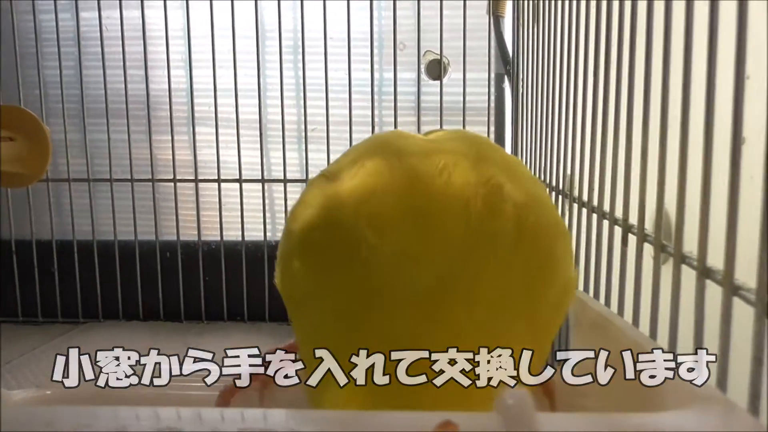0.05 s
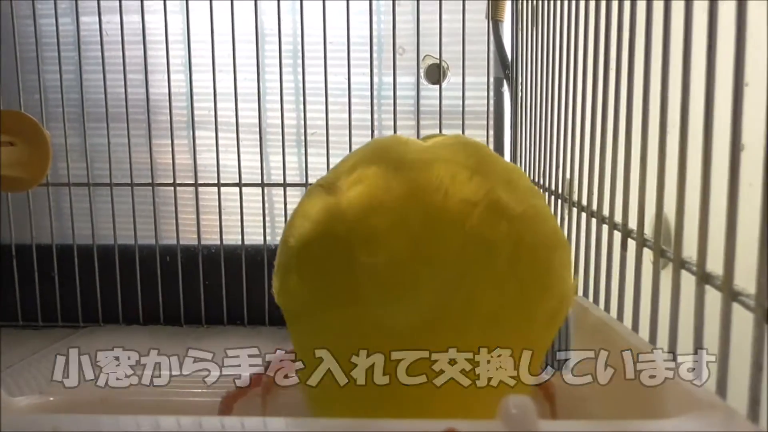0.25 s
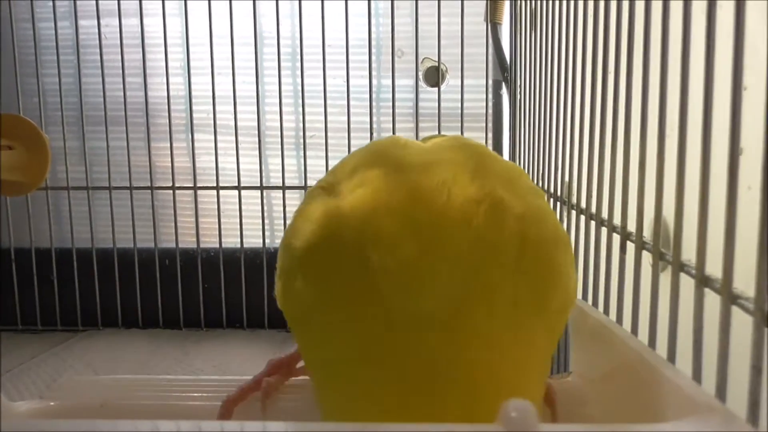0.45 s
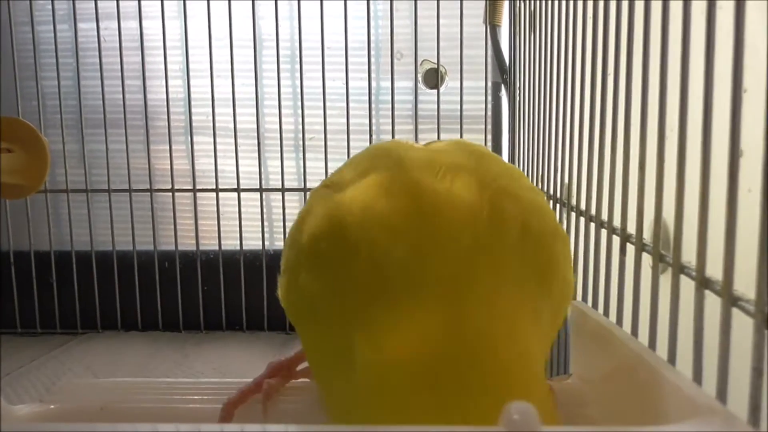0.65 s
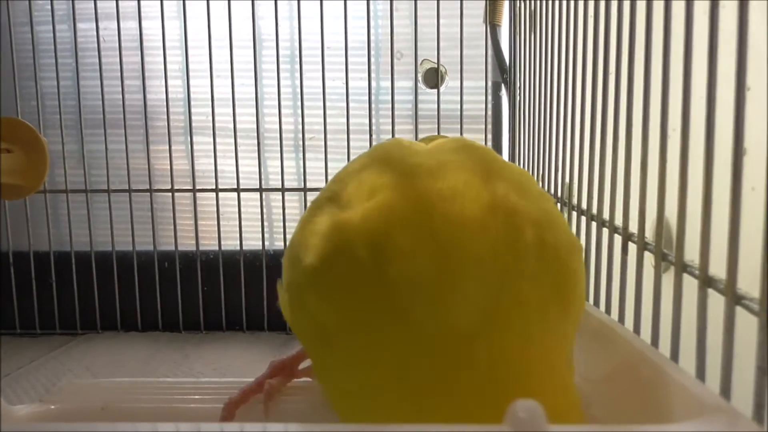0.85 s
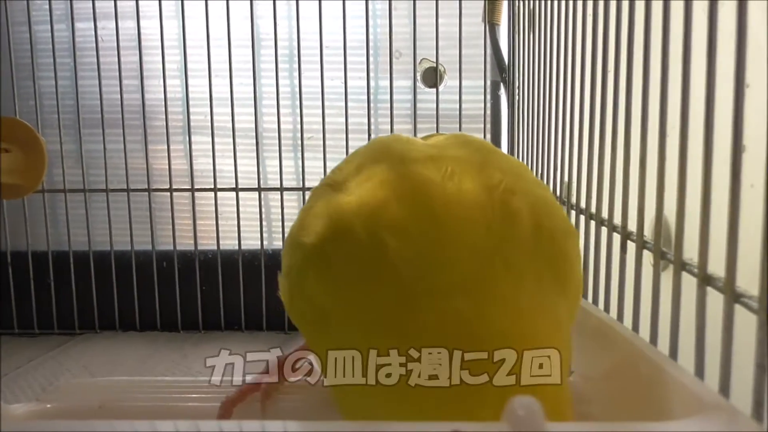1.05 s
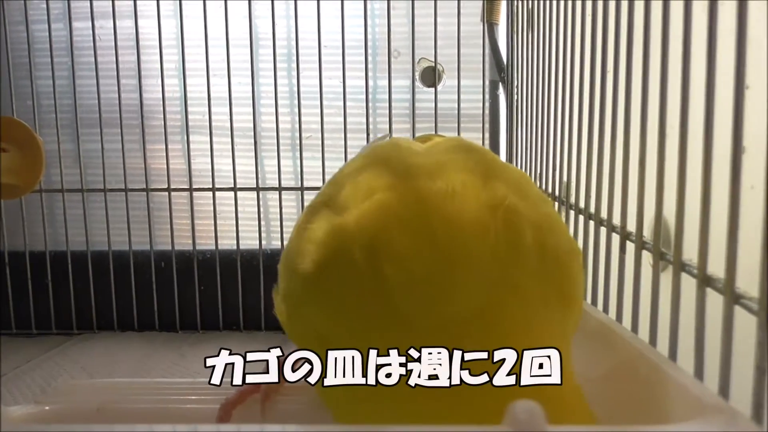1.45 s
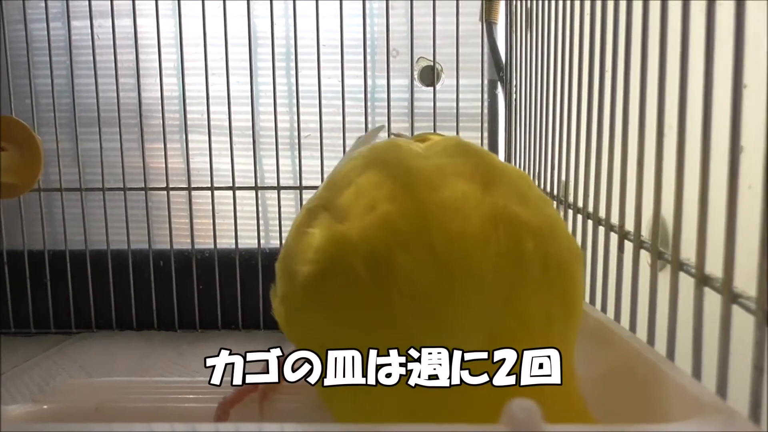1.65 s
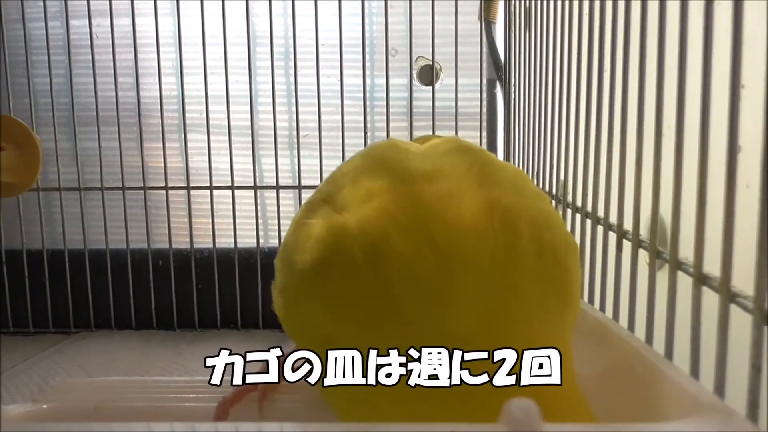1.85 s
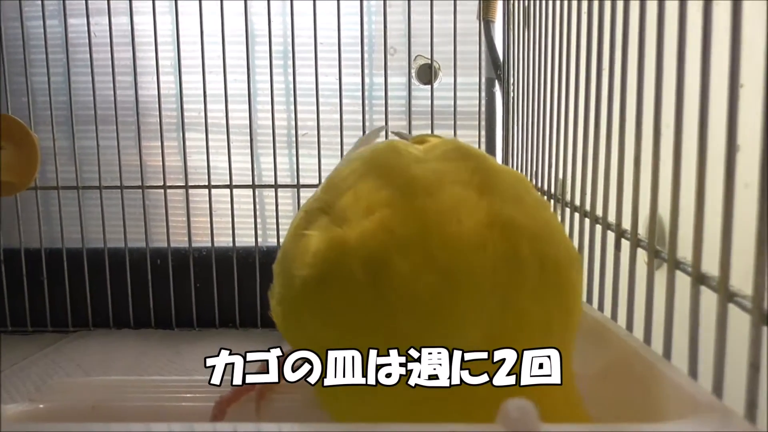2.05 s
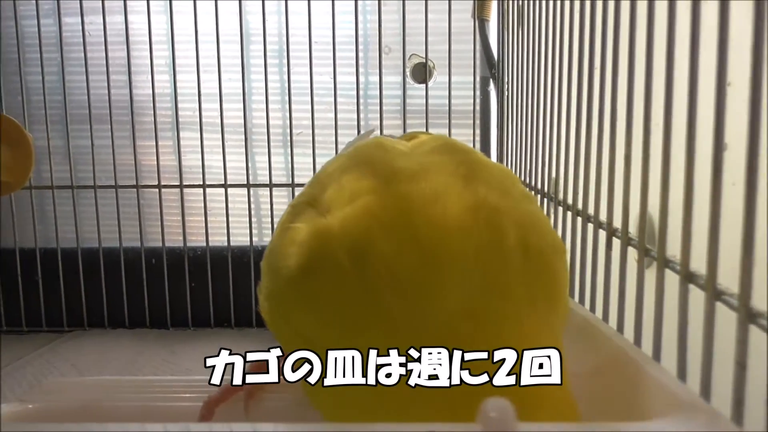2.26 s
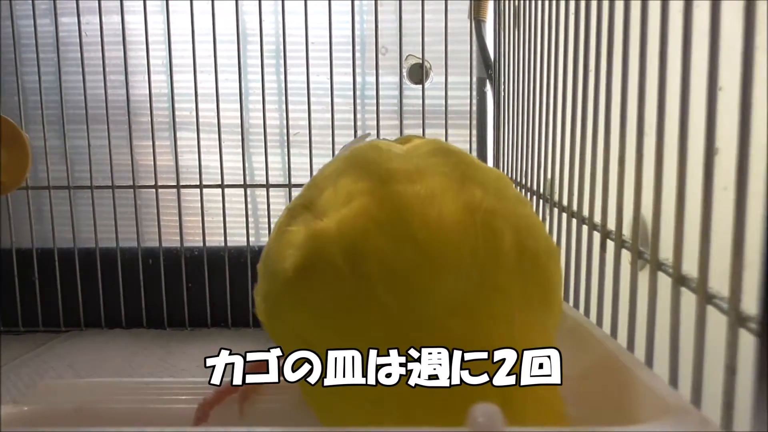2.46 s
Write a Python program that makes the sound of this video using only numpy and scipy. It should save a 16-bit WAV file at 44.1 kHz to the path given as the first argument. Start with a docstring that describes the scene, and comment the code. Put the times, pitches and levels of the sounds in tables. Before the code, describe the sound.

Light taps and gritty scrapes of a budgie's beak and claws on its cage floor.

```python
"""A budgerigar shuffles and pecks in the plastic tray of a wire cage, close by, over soft room noise.
First its beak and claws tap the tray, which clacks and thuds. Between taps they scrape over it in short
gritty strokes that ring the wires, and now and then they stick and squeak. After a second the bird
grows quieter; a busy flurry follows from 1.6 s, and a few light taps end the scene.
All along, the cage and the room add short echoes."""
import sys
import numpy as np
from scipy import signal
from scipy.fft import rfft, irfft
from scipy.io import wavfile
from scipy.ndimage import uniform_filter1d

SR = 44100
rng = np.random.default_rng(int(sys.argv[2]) if len(sys.argv) > 2 else 0)


def bounce(signal):
    """Save signal as a 16-bit WAV file at the path given by the first command-line argument."""
    frames = np.transpose(np.atleast_2d(signal))
    limited = np.clip(frames, -1, 1)
    pcm = np.round(limited * 32767).astype(np.int16)
    wavfile.write(sys.argv[1], SR, pcm)


N = 110250
t = np.arange(N) / SR

# The tones of the plastic tray: pitch_hz, level_db, ring_s (time to fade by 60 dB)
TRAY_TONES = [(190.5, -12.5, 0.079), (246, -12, 0.043), (272, -5.5, 0.045), (324, -4, 0.035),
              (399, 0, 0.038), (476, -9, 0.031), (560, -13, 0.044), (628, -9, 0.024), (650, -7.5, 0.033),
              (860, -30, 0.017), (975, 4, 0.0077), (1206, -11, 0.024), (1337, 5, 0.008), (1609, -9, 0.013),
              (1892, -2, 0.0068)]
THUD_BELOW_HZ = 900  # lower tray tones make the thud, the others the clack


def amp(db):
    """Turn decibels into a gain."""
    return 10 ** (np.asarray(db) / 20)


def unit(x):
    """Scale a sound to an average (rms) level of 1."""
    return x / np.sqrt(np.mean(x ** 2))


def neutral(x):
    """Scale to a total energy of 1, so that noise played through it keeps its power."""
    return x / np.sqrt(np.sum(x ** 2))


def through(x, response):
    """Play a sound through a response: the way an object answers a single click."""
    return signal.fftconvolve(x, response)[:N]


def filtered(x, order, hz, kind):
    """Keep the lows, the highs or a band; a higher order cuts more steeply."""
    return signal.sosfilt(signal.butter(order, hz, kind, fs=SR, output="sos"), x)


def colour(points, size=2048):
    """Build a response whose tone follows (pitch_hz, level_db) points."""
    hz, db = np.array(points, float).T
    freqs = np.maximum(np.fft.rfftfreq(size, 1 / SR), 1)
    gains = amp(np.interp(np.log(freqs), np.log(hz), db))
    cepstrum = irfft(np.log(gains))
    cepstrum[1:size // 2] *= 2  # fold it so that nothing sounds before the click
    cepstrum[size // 2 + 1:] = 0
    return irfft(np.exp(rfft(cepstrum)))


def rise_and_fade(rise_s, ring_s, size):
    """A level that builds quickly and falls by 60 dB in ring_s."""
    age = t[:size]
    return (1 - np.exp(-(age / rise_s) ** 2)) * np.exp(-np.log(1000) * age / ring_s)


def ring(tones, contact_s=0.00037, size=8192):
    """A struck object rings with several fading tones; the peak is 1."""
    sound = sum(amp(db) * np.sin(2 * np.pi * hz * t[:size]) * rise_and_fade(contact_s, ring_s, size)
                for hz, db, ring_s in tones)
    return sound / np.abs(sound).max()


def stereo(mid, side, width):
    """Left and right share the mid sound and differ by the side sound."""
    return np.array([mid + width * side, mid - width * side])


def add(out, start_s, sound, pan_db):
    """Mix a sound in at its time; pan_db is how much louder it is on the left."""
    i = int(start_s * SR)
    sound = sound[..., :N - i]
    out[:, i:i + sound.shape[-1]] += amp([[pan_db / 2], [-pan_db / 2]]) * sound


def room_noise(level_db=-63):
    """Soft, low room noise, mostly alike on both sides."""
    # The tone of the quiet room: pitch_hz, level_db
    room_tone = [(20, -9), (50, -13), (80, 0), (140, -5), (195, 3), (260, -9), (600, -13.5), (900, -13),
                 (1300, -18), (2400, -31.5), (5500, -35), (9000, -29.5), (12000, -27), (16000, -31.5)]
    response = colour(room_tone, size=8192)
    mid, side = (unit(through(rng.standard_normal(N), response)) for _ in range(2))
    return amp(level_db) * stereo(mid, side, width=0.52)


def cage_and_room_echoes(dry, first_echo_s=0.0011, size=26000):
    """Quick echoes inside the cage and the longer tail of the room."""
    # Echoes by band: low_hz, high_hz, cage_db, cage_ring_s, room_db, room_ring_s, width (0 to 1)
    echo_bands = [(77, 780, -9, 0.1, -7, 0.17, 0.96), (556, 1730, -13, 0.054, -11.5, 0.2, 1),
                  (2410, 11900, -4.5, 0.015, -17, 0.44, 0.24)]
    response = 0
    for low_hz, high_hz, cage_db, cage_ring_s, room_db, room_ring_s, width in echo_bands:
        band_gain = np.sqrt(2 * (high_hz - low_hz) / SR)  # a wider band holds more energy
        for db, ring_s in ((cage_db, cage_ring_s), (room_db, room_ring_s)):
            noise = filtered(rng.standard_normal((2, size)), 3, [low_hz, high_hz], "band")
            mid, side = noise * rise_and_fade(first_echo_s, ring_s, size)
            tails = np.array([neutral(tail) for tail in stereo(mid, side, width)])
            response = response + amp(db) * band_gain * tails
    return np.array([through(channel, tail) for channel, tail in zip(dry, response)])


def wall_echoes(x, delay_s=0.0052, bounce_gain=0.075, top_hz=2600):
    """Sound bounces to and fro between two walls: four quick, dull echoes make the knocks boxy."""
    lag = int(delay_s * SR)
    dull = filtered(x, 1, top_hz, "low")
    return sum(bounce_gain ** k * np.pad(dull, ((0, 0), (k * lag, 0)))[:, :N] for k in range(1, 5))


def slips(per_s, spread_db, size):
    """Tiny slips of a claw: random clicks of uneven strength, pushing either way."""
    happens = rng.random(size) < per_s / SR
    direction = rng.choice([-1, 1], size)
    return happens * direction * amp(spread_db * np.clip(rng.standard_normal(size), -2, 2))


def shudder(knock, level_db, ring_s, rise_s=0.0054):
    """A knock plus the short, uneven shudder it sets off in the tray, different every time."""
    size = len(knock)
    shaking = neutral(rng.standard_normal(size) * rise_and_fade(rise_s, ring_s, size))
    shaken = neutral(through(knock, shaking)[:size])
    return knock + amp(level_db) * np.linalg.norm(knock) * shaken


def tray_clack(top_hz=2080):
    """The tray's higher tones make a hollow clack; it gives off little above top_hz."""
    high_tones = [tone for tone in TRAY_TONES if tone[0] >= THUD_BELOW_HZ]
    return neutral(filtered(ring(high_tones), 10, top_hz, "low"))


def tray_thud(spot_hz, loss_db_per_octave=7, spread_db=3):
    """Each spot of the tray favours the low tones near its own pitch; the mix varies with each blow."""
    tones = []
    for hz, db, ring_s in TRAY_TONES:
        if hz < THUD_BELOW_HZ:
            loss_db = loss_db_per_octave * abs(np.log2(hz / spot_hz))
            tones.append((hz, db - loss_db + spread_db * rng.standard_normal(), ring_s))
    return shudder(ring(tones), level_db=-6.5, ring_s=0.11)


def grit_and_wires(forces, tilt_db_per_octave, wire_db=-10.5, wire_spread_db=6, detune=0.0068):
    """A hard little contact: each has its own gritty tone and shakes a different mix of wires."""
    # The ringing of the cage wires: pitch_hz, level_db, ring_s
    wire_tones = [(2716, 0, 0.064), (3670, 1, 0.078), (7940, 11, 0.014), (8900, -10, 0.015),
                  (10330, 11.5, 0.025), (11270, 16, 0.019)]
    # The tone of a tiny contact: pitch_hz, level_db
    grit_tone = [(500, -1), (1800, -11), (2350, -5.5), (2750, -3), (3700, -1), (5600, -6), (7800, 2.5),
                 (10500, 1.5), (12500, -0.5), (15000, -8), (16500, -19)]
    wires = []
    for hz, db, ring_s in wire_tones:
        louder, higher = rng.standard_normal(2)  # neighbouring wires differ a little in pitch
        wires.append((hz * (1 + detune * higher), db + wire_spread_db * louder, ring_s))
    grit = [(hz, db + rng.standard_normal()) for hz, db in grit_tone]
    response = neutral(colour(grit, size=8192)) + amp(wire_db) * neutral(ring(wires))
    # tip the treble up or down around 8000 Hz
    tilt = colour([(8000 * 2 ** octaves, tilt_db_per_octave * octaves) for octaves in (-1.5, 1)])
    response = neutral(through(response, tilt)[:len(response)])
    mid, side = (through(force, response) for force in forces)
    return stereo(mid, side, width=0.56)


def fidgeting_feet(clack_db=-74.5, grit_db=-84.5):
    """The restless feet keep making ticks that can barely be heard."""
    clicks = slips(per_s=110, spread_db=3, size=N)
    clacks = through(clicks, tray_clack())
    grit = grit_and_wires([clicks, clicks * rng.standard_normal(N)], tilt_db_per_octave=-12)
    return amp(clack_db) * unit(clacks) + amp(grit_db) * unit(grit)


def squeaks_and_wire_rings(pitch_waver=0.063, flutter_db=3.5, size=2000):
    """Short wavering tones: a claw sticks and slips, or a cage wire rings briefly."""
    # Claw squeaks and creaks, plus two brief high rings of the cage wires (2730 and 2750 Hz):
    # start_s, length_s, pitch_hz, level_db, pan_db
    short_tones = [(0.278, 0.046, 1120, -50.5, -5), (.550, 0.0182, 1250, -44, -7),
                   (0.605, 0.016, 1294, -52.5, -10), (0.764, 0.036, 1239, -49, -9),
                   (0.775, 0.0084, 2730, -51, -9), (0.913, 0.05, 395, -54.5, 4),
                   (0.927, 0.016, 1287, -48, 1), (1.698, 0.012, 2750, -48.5, -4),
                   (2.028, 0.012, 2000, -47.5, -3), (2.066, 0.0093, 1418, -44, -17),
                   (2.067, 0.025, 1032, -44, -6)]
    out = np.zeros((2, N))
    for start_s, length_s, pitch_hz, level_db, pan_db in short_tones:
        waver, flutter = (unit(uniform_filter1d(rng.standard_normal(size), size=40)) for _ in range(2))
        phase = 2 * np.pi * np.cumsum(pitch_hz * (1 + pitch_waver * waver)) / SR
        tone = np.sqrt(2) * np.sin(phase) * unit(amp(flutter_db * flutter))
        swell = np.sqrt(np.abs(np.sin(np.pi * np.minimum(t[:size] / length_s, 1))))
        add(out, start_s, amp(level_db) * swell * tone, pan_db)
    return out


def shower(pressure, per_s, spread_db):
    """A shower of slips that gets louder as the claw presses harder."""
    return neutral(slips(per_s, spread_db, len(pressure)) * pressure) * np.linalg.norm(pressure)


def scrapes(thud_hz=306, size=12000):
    """A claw drags over the tray: its tiny slips swell and fade, shaking the tray and the wires."""
    # Claw strokes: peak_s, rise_s, fall_s, grit_db, tilt_db_per_octave, clack_db, thud_db, pan_db
    strokes = [(0.057, 0.092, 0.0051, -66, 0.5, -62.5, -94, 2.5),
               (0.115, 0.0085, 0.016, -61, 0.5, -61.5, -67, 5.5),
               (.229, 0.0082, 0.015, -54, -4.5, -47.5, -63, 3), (0.277, 0.019, 0.051, -71, 5, -54, -51, -4),
               (0.33, 0.0009, 0.0029, -39, 0.5, -34.5, -67, 2.5),
               (0.371, 0.0019, 0.0075, -42, 1, -46.5, -47, 2.5),
               (0.387, 0.0088, 0.034, -51, -2.5, -43, -49, 1),
               (0.487, 0.0018, 0.015, -44, -1.5, -47.5, -79, 1.5),
               (0.505, 0.0048, 0.012, -51, -2, -49, -44, 4),
               (0.5495, 0.00066, 0.0084, -42.5, 5, -73, -48, 0.5),
               (.582, .002, 0.015, -55.5, 0.5, -57.5, -51.5, 3.5),
               (.62, .012, 0.025, -66.5, -20, -64.5, -60.5, 2),
               (0.779, 0.0078, 0.0056, -53, -5.5, -56, -54, 2),
               (.797, 0.0034, 0.032, -60.5, -1.5, -61, -65, 2.5),
               (.919, 0.0054, 0.014, -45, 0.5, -60.5, -66, 1.5),
               (.932, 0.0046, 0.0088, -40.5, -1, -49, -56, 2), (.955, .008, 0.026, -72, -13, -63.5, -53, 4),
               (1.085, 0.0069, 0.017, -65.5, 0, -92, -70, 3),
               (1.613, 0.0019, 0.0069, -52, 3, -58.5, -58, -3.5),
               (1.632, 0.0027, 0.0044, -53, 3.5, -61.5, -77, 11),
               (1.648, 0.0019, 0.0065, -49.5, 4.5, -57, -60, -6),
               (1.665, 0.0052, 0.015, -48.5, -0.5, -53.5, -47, 6.5),
               (1.702, 0.0048, 0.015, -48.5, 0, -50.5, -77, -3),
               (1.716, 0.005, 0.015, -50, -1.5, -57.5, -53.5, 3),
               (1.737, 0.004, 0.007, -58, -9, -51, -60, -5),
               (1.771, 0.0054, 0.012, -44.5, -0.5, -49, -59, 5),
               (1.837, 0.0081, 0.024, -58, -3.5, -57, -51.5, 3),
               (1.998, 0.0015, 0.016, -45, 5, -51, -80, 4),
               (2.011, 0.0052, 0.025, -48.5, -2.5, -45.5, -47, -1),
               (2.053, 0.0019, 0.0042, -47, 1, -43, -49, 6),
               (2.066, 0.0032, 0.0026, -44.5, 0, -43, -56, -3),
               (2.111, 0.0076, 0.014, -48.5, 1, -55, -46, 0.5),
               (2.159, .004, 0.001, -44.5, 3.5, -46.5, -42, 0),
               (2.211, 0.0076, 0.02, -50, 2.5, -56.5, -46, 2),
               (2.26, 0.0091, 0.16, -67.5, -1, -67, -69.5, 1),
               (2.482, 0.025, 0.032, -64.5, -4, -54, -59, -4)]
    out = np.zeros((2, N))
    for peak_s, rise_s, fall_s, grit_db, tilt, clack_db, thud_db, pan_db in strokes:
        start_s = max(peak_s - 4 * rise_s, 0)
        since_peak = start_s + t[:size] - peak_s
        pressure = np.exp(np.minimum(since_peak / rise_s, -since_peak / fall_s))
        clack_slips, thud_slips = (shower(pressure, per_s=4500, spread_db=6) for _ in range(2))
        sharp_slips = [shower(pressure, per_s=2200, spread_db=6.5) for _ in range(2)]
        clack = amp(clack_db) * through(clack_slips, tray_clack())
        thud = amp(thud_db) * through(thud_slips, neutral(tray_thud(thud_hz)))
        grit = amp(grit_db) * grit_and_wires(sharp_slips, tilt)
        add(out, start_s, clack + thud + grit, pan_db)
    return out


def taps(band_ratio=1.285, tick_fall_s=0.0011, snap_gain=0.33, size=400):
    """Beak or claw hits the tray: a clack pitched by the contact, a thud and a crackly tick."""
    # Hits of beak and claws: start_s, clack_db, clack_hz, thud_db, thud_hz,
    # tick_db (before the tick is doubled), tilt_db_per_octave, pan_db
    hits = [(0.0387, -42, 1460, -62, 400, -45, -5, 3), (0.069, -46, 1260, -52, 300, -43, 2.5, 1.5),
            (.116, -51, 1310, -68, 300, -28.5, 3.5, 1.5), (0.2203, -18, 1490, -43.5, 230, -23.5, 3.5, 3),
            (0.3323, -27, 1680, -42, 285, -46, -2, 2.5), (0.3827, -23.5, 1450, -39, 230, -45, 7, 3.5),
            (0.3941, -32, 1040, -43.5, 420, -42, 11, -11.5), (0.4885, -27, 1740, -55, 300, -32.5, -2, 3),
            (0.5019, -27, 1250, -33, 404, -38, -2, 0.5), (.606, -52, 1310, -65, 250, -40.5, -13, -10),
            (0.6758, -38.5, 1410, -57, 252, -26, 1, 1), (0.735, -50, 1300, -53.5, 300, -39, 6, 3),
            (.816, -47.5, 1300, -51, 500, -47.5, -4, -12), (0.909, -49, 1430, -54, 400, -29, 4, 3),
            (0.929, -40, 1340, -67, 400, -40, -12, 1), (1.062, -81, 1410, -70, 300, -43, 3, 1),
            (1.0815, -40.5, 1480, -53, 303, -31, -1, 0.5), (1.092, -52, 1340, -70, 300, -41.5, 11, 0),
            (1.161, -48.5, 1030, -48.5, 510, -56, -2, 3), (1.177, -52.5, 1200, -51, 500, -50.5, 2, 2),
            (1.3272, -39, 1360, -70, 407, -30.5, -6.5, 1.5), (1.536, -54.5, 1300, -54, 305, -46.5, 1.5, 8),
            (1.598, -51, 1050, -72, 300, -40, -11, 2), (1.6598, -51, 1400, -62, 240, -22, 12, 5),
            (1.6655, -42.5, 1140, -38.5, 334, -26.5, 5, -8), (1.7035, -40.5, 1330, -47, 260, -45, -9, -9),
            (1.7714, -59, 1400, -48, 300, -20, 11, -5), (1.784, -29, 1100, -27.5, 420, -32.5, -1, 2.5),
            (1.824, -62, 1210, -63, 300, -35.5, 2.5, 2), (1.833, -42, 920, -36.5, 386, -50, -4, 2),
            (1.916, -48, 1090, -71, 400, -43, -7, 2), (2.0118, -26, 1470, -34, 291, -28.5, 0, 4.5),
            (2.1008, -37, 1150, -31.5, 330, -31, 5.5, 3.5), (2.109, -44, 1040, -36, 270, -50, -2, 10),
            (2.12, -39, 1050, -46, 400, -57, -5, 1), (2.1599, -37, 1120, -37.5, 350, -32, 5.5, 4),
            (2.2076, -30, 1090, -32.5, 350, -58, 19, 4), (2.4153, -39, 1490, -46.5, 500, -37.5, -2.5, 2.5),
            (2.455, -53, 1460, -55, 396, -52, -6, -2.5), (2.478, -53, 1280, -54, 400, -45.5, -5, 8)]
    out = np.zeros((2, N))
    for start_s, clack_db, clack_hz, thud_db, thud_hz, tick_db, tilt, pan_db in hits:
        clack = filtered(tray_clack(), 2, [clack_hz / band_ratio, clack_hz * band_ratio], "band")
        clack = shudder(clack / np.abs(clack).max(), level_db=-9, ring_s=0.035)
        add(out, start_s, amp(clack_db) * clack, pan_db)
        add(out, start_s, amp(thud_db) * tray_thud(thud_hz), pan_db)
        fade = np.exp(-t[:size] / tick_fall_s)
        mid, side = (neutral(rng.standard_normal(size) * fade) for _ in range(2))
        mid = neutral(mid + snap_gain * signal.unit_impulse(size))  # a clean snap leads the crackle
        add(out, start_s, 2 * amp(tick_db) * grit_and_wires([mid, side], tilt), pan_db)
    return out


def scene(low_cut_hz=130):
    """The bird in its cage, in the room; the small tray gives off little deep bass."""
    bird = taps() + scrapes() + squeaks_and_wire_rings() + fidgeting_feet()
    bird = filtered(bird, 2, low_cut_hz, "high")
    return bird + wall_echoes(bird) + cage_and_room_echoes(bird) + room_noise()


def record(dry, top_hz=16000):
    """The left microphone is a little duller; the highest treble is cut steeply on both sides."""
    # The tone of the left microphone: pitch_hz, level_db
    left_tone = [(100, -1), (5000, -1.5), (9000, -2), (13000, -5.5), (16000, -21.5)]
    heard = np.array([through(dry[0], colour(left_tone)), dry[1]])
    return signal.sosfilt(signal.ellip(8, .2, 70, top_hz, fs=SR, output="sos"), heard)


dry = scene()
out = record(dry)
bounce(out)
```